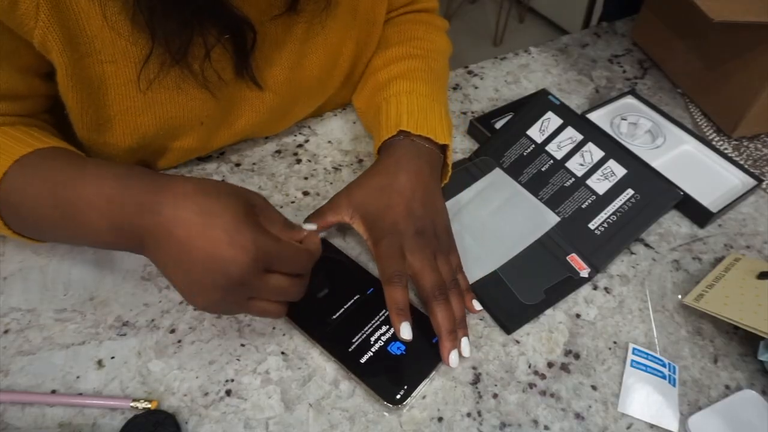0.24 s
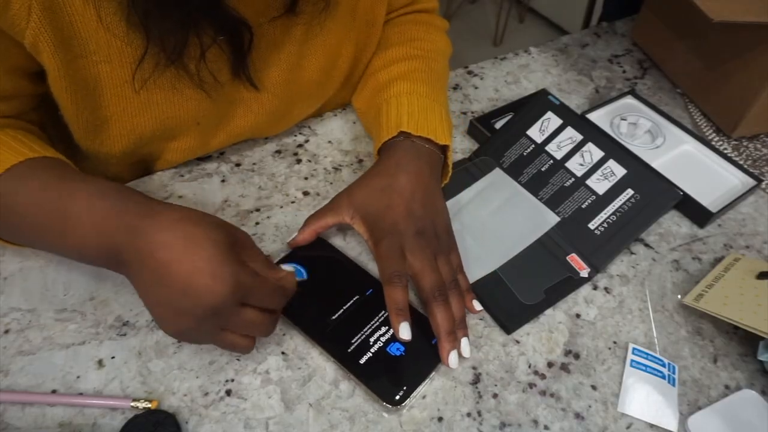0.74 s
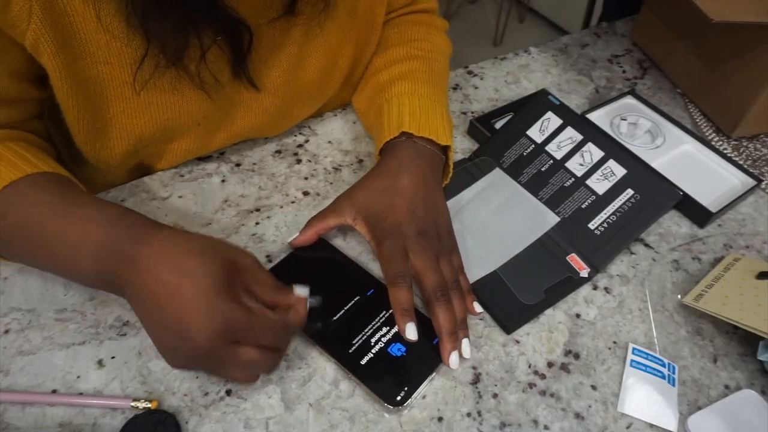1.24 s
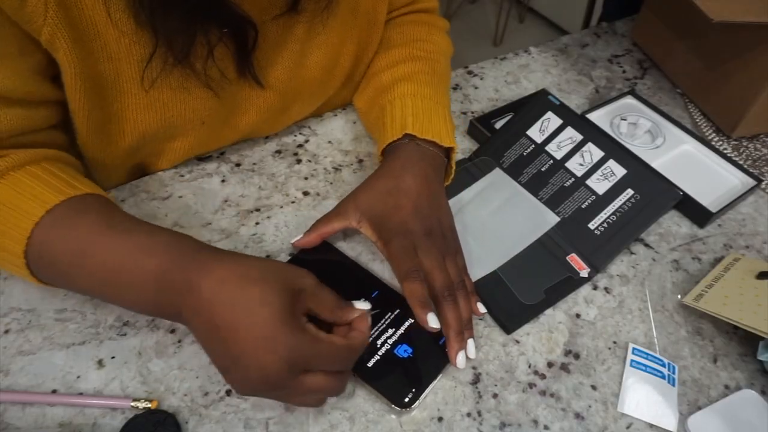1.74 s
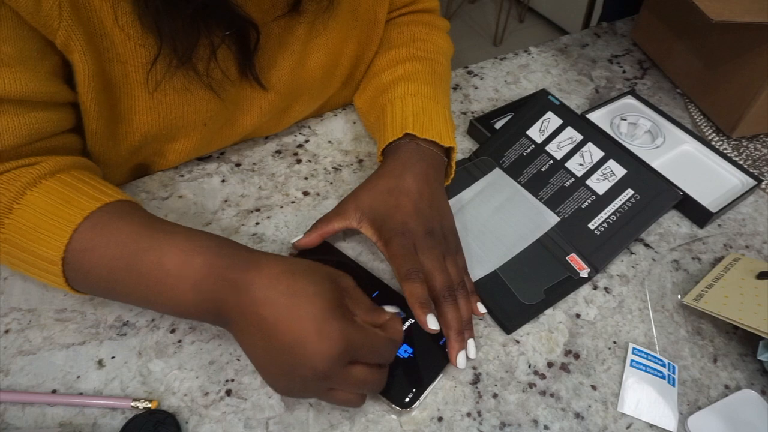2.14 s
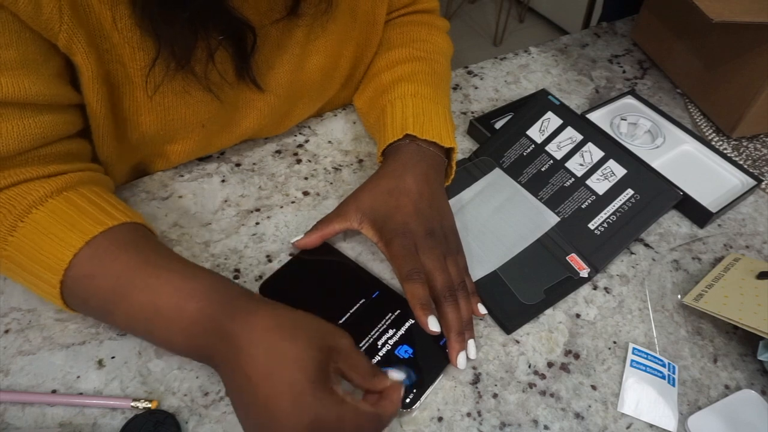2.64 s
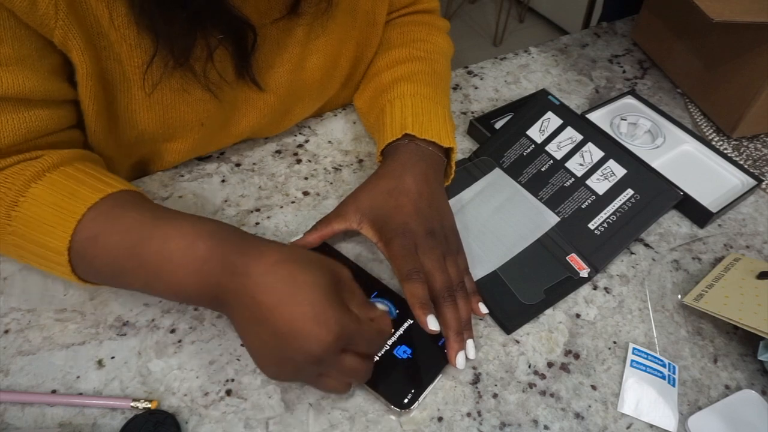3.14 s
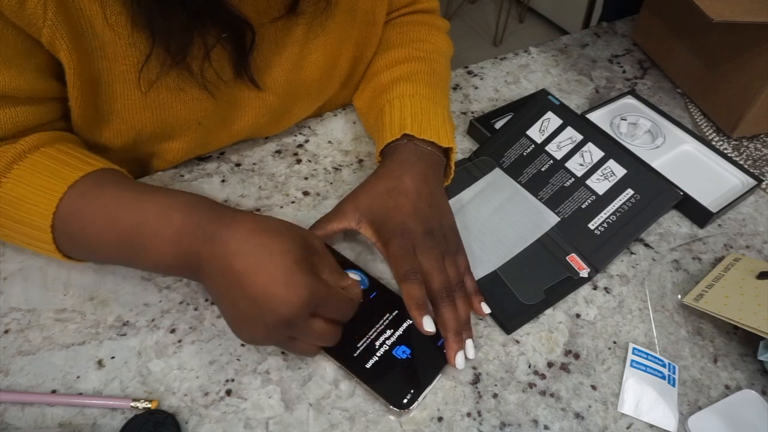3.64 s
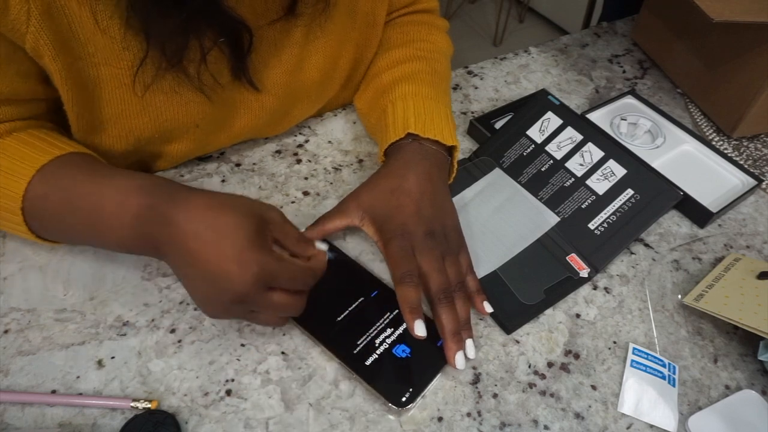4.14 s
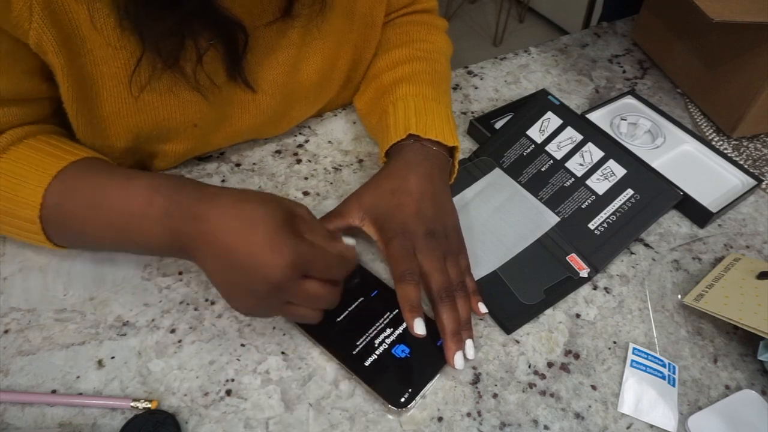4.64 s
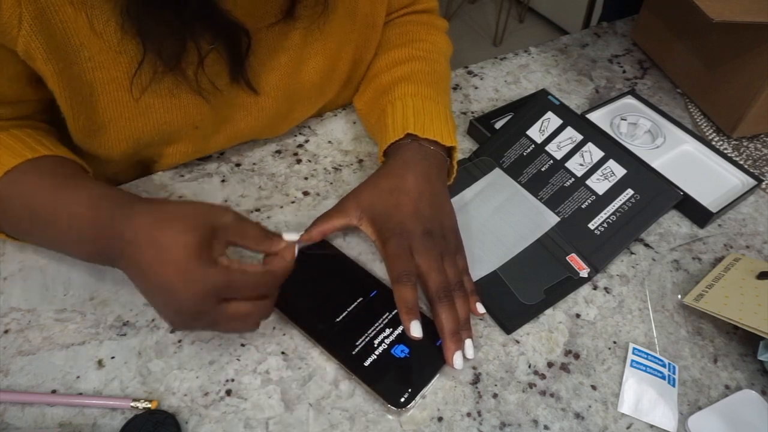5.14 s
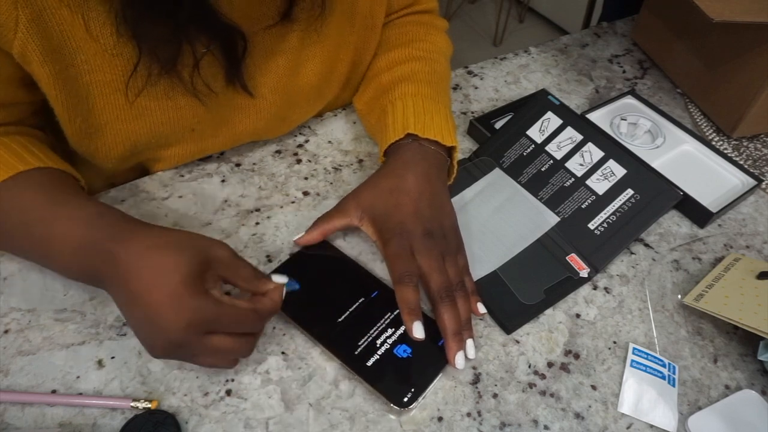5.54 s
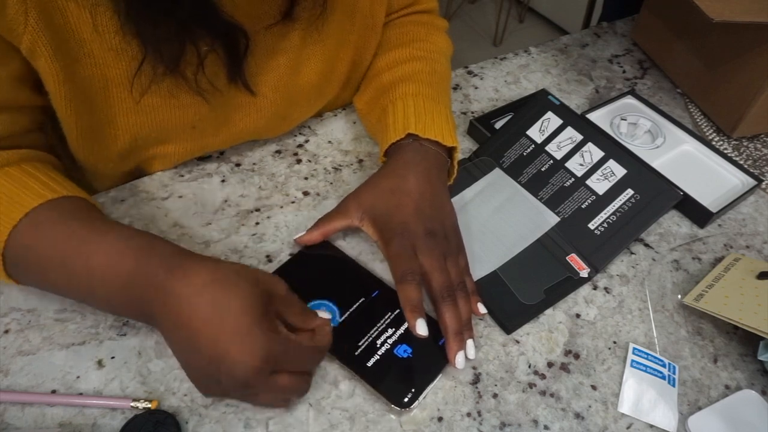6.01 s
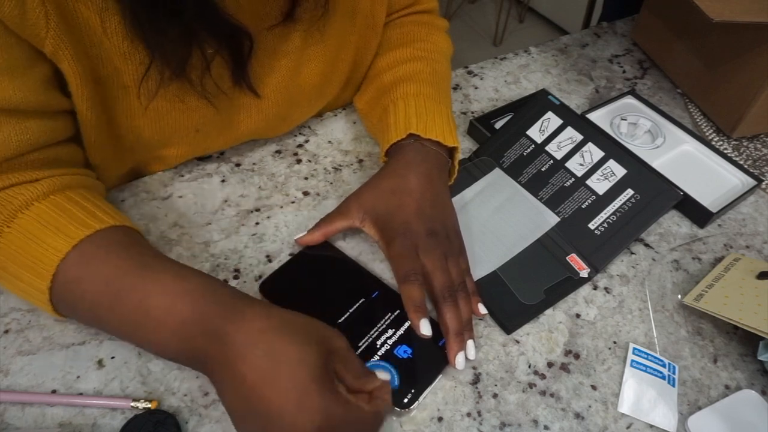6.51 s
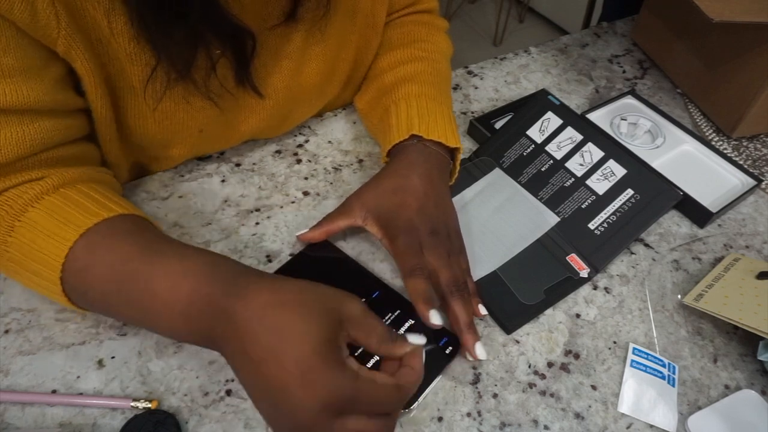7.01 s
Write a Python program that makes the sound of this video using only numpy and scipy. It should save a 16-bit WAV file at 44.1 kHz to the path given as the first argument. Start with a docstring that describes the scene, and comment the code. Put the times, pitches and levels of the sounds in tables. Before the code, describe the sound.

Long fingernails tap irregularly on a phone's glass screen, sharp dry clicks with small clusters and dull knocks on stone in a quiet kitchen.

```python
"""Fingernails on a glass phone

Long nails tap and skid over the glass of a phone that lies on a stone counter; one slides briefly.
Each tap is a single contact or a cluster of them: a snap and grainy skid drive resonances of nail, nail tip,
glass and case. Fingertips touch softly, and now and then the phone rocks and knocks on the stone.
Decaying bands of noise make a hard-walled kitchen ring on around them, over a quiet, steady hush."""
import sys
import numpy as np
from scipy import signal
from scipy.fft import rfft, irfft, next_fast_len
from scipy.io import wavfile

SR = 44100
rng = np.random.default_rng(int(sys.argv[2]) if len(sys.argv) > 2 else 0)


def dump(signal):
    """Clip the signal to [-1, 1] and save it as 16-bit WAV at the path in sys.argv[1]."""
    limited = np.clip(np.atleast_2d(signal).T, -1, 1)
    pcm = np.round(limited * 32767).astype(np.int16)
    wavfile.write(sys.argv[1], SR, pcm)


N = 320607  # samples in the scene
CONTACT_SIZE = 1536  # samples in one short contact sound


def from_db(db):
    """Decibels to gain."""
    return 10 ** (np.asarray(db) / 20)


def at_hz(points, hz):
    """Read a table on a log-frequency axis."""
    f, value = np.transpose(points)
    return np.interp(np.log(hz), np.log(f), value)


def band(x, low_hz, high_hz, order=2):
    """Causal band-pass."""
    sos = signal.butter(order, [low_hz, min(high_hz, SR / 2 - 1)], "band", fs=SR, output="sos")
    return signal.sosfilt(sos, x)


def resonate(x, modes):
    """Parallel two-pole resonances with alternating signs; a wider mode dies sooner."""
    out = 0
    for k, (hz, width_hz, db) in enumerate(modes):
        radius = np.exp(-np.pi * width_hz / SR)
        poles = [1, -2 * radius * np.cos(2 * np.pi * hz / SR), radius * radius]
        ringing = (1 - radius * radius) / 2 * signal.lfilter([1, 0, -1], poles, x)
        out = out + (-1) ** k * from_db(db) * ringing
    return out


def ring_each(force, pitches_hz, width_hz):
    """Every contact drives one resonance of its own pitch."""
    rings = [resonate(force[:, k], [(hz, width_hz, 0)]) for k, hz in enumerate(pitches_hz)]
    return np.stack(rings, axis=1)


def two_ears(pair, alike):
    """Mix two unrelated signals into left and right of a given likeness."""
    alike = np.clip(alike, -1, 1)
    mid = np.sqrt((1 + alike) / 2) * pair[0]
    side = np.sqrt((1 - alike) / 2) * pair[1]
    return np.array([mid + side, mid - side])


def contact(count, snap, chatter_s, skid_db, skid_s, alike):
    """Force of each contact: one sharp snap, a brief chatter, then a faint grainy skid."""
    t = np.arange(CONTACT_SIZE) / SR
    grains = rng.standard_normal((count, 2, CONTACT_SIZE)).swapaxes(0, 1)
    grains = grains * np.abs(grains)  # spikier than plain noise
    skid = np.reshape(from_db(skid_db), (-1, 1)) * np.exp(-t / skid_s)
    force = grains * (np.exp(-t / chatter_s) + skid)
    force[0, :, 0] += snap
    return two_ears(force, alike)


def at_level(sounds, level_db):
    """Give each short sound its level: its whole energy, taken as rms over 5 ms."""
    power = np.sum(sounds ** 2, axis=-1).mean(axis=0) / (.005 * SR)
    return sounds * (from_db(level_db) / np.sqrt(power))[:, None]


def blend(first, second, share, level_db):
    """Two sounds split a level between them; the first takes the given share of the power."""
    share = np.clip(share, .02, .98)  # neither falls silent
    first_db = level_db + 10 * np.log10(share)
    second_db = level_db + 10 * np.log10(1 - share)
    return at_level(first, first_db) + at_level(second, second_db)


def place(times, sounds):
    """Lay short stereo sounds out in time."""
    out = np.zeros((2, N + 2 * CONTACT_SIZE))
    for k, s in enumerate(times):
        start = int(np.clip(round(s * SR), 0, N))
        out[:, start:start + CONTACT_SIZE] += sounds[:, k]
    return out[:, :N]


# How alike the two channels are in diffuse sound.
# Each row: frequency in Hz, likeness from 0 to 1.
DIFFUSE_LIKENESS = [(60, .9), (500, 0.37), (1200, 0.3), (2500, 0.52), (4500, 0), (11000, 0.48)]


def diffuse_bands(size):
    """Half-octave bands of stereo noise as (centre Hz, noise), together flat."""
    edges = 22 * 2 ** (np.arange(20) / 2)
    for low, high in zip(edges, edges[1:]):
        hz = np.sqrt(low * high)
        noise = band(rng.standard_normal((2, size)), low, high, order=3)
        yield hz, two_ears(noise, at_hz(DIFFUSE_LIKENESS, hz))


# Colour of the room's quiet air.
# Each row: frequency in Hz, relative spectral level in dB per Hz.
AIR_COLOUR = [(25, -9), (55, -5.5), (120, 0), (250, -2), (370, -5.5), (600, -2), (850, -1.5), (1300, -4),
              (3000, -9), (5500, -9), (11000, -18)]
AIR_DB = -61  # rms of the whole hush


def room_air():
    """A steady, soft hush of noise, shaped band by band."""
    air = sum(noise * from_db(at_hz(AIR_COLOUR, hz)) for hz, noise in diffuse_bands(size=N))
    return from_db(AIR_DB) * air / air.std()


# How long the kitchen rings. Each row: frequency in Hz, time to fall by 60 dB in seconds.
KITCHEN_T60 = [(120, 0.53), (400, 1.1), (1000, 0.57), (2800, 0.55), (6000, .5), (11000, 0.53)]
# How loudly it answers. Each row: frequency in Hz, reverberant level in dB relative to the direct sound.
KITCHEN_LEVEL = [(120, -1.5), (300, -0.5), (700, -8), (1500, -8.5), (3000, -12), (5500, -6), (8000, -6.5),
                 (11000, -23)]


def kitchen(x, build_s=0.007):
    """Reflections thicken within milliseconds, then each band dies at its own rate."""
    t = np.arange(SR) / SR
    build = 1 - np.exp(-(t / build_s) ** 2)
    ending = np.cos(np.pi / 2 * t ** 4) ** 2  # closes the one-second response smoothly
    response = 0
    for hz, noise in diffuse_bands(size=SR):
        decay = np.exp(-np.log(1000) * t / at_hz(KITCHEN_T60, hz))
        fade = decay * build * ending
        unit_fade = fade / np.sqrt(np.sum(fade ** 2))
        response = response + noise * unit_fade * from_db(at_hz(KITCHEN_LEVEL, hz))
    return signal.fftconvolve(x, response, axes=1)[:, :N]


# Things in the kitchen that ring on in sympathy.
# Each row: frequency in Hz, width in Hz, gain in dB.
SYMPATHETIC_MODES = [(108, 5.3, 0.5), (218.5, 10, 8.5), (741.5, 2.4, 3)]


def reflections(nails, knocks, knock_db=1.0):
    """What leaves to the left and to the right meets different walls; kitchen things hum along."""
    left, right = (nails + from_db(knock_db) * knocks)[:, None]
    walls = (kitchen(left) + kitchen(right)) / np.sqrt(2)
    return walls + resonate((left + right) / 2, SYMPATHETIC_MODES)


# The phone rocking on the counter.
# Each row: start in seconds, body level in dB, hard edge in dB relative to the body,
# seconds until it drops back (0 if it does not).
PHONE_ROCKS = [(0.723, -51.5, -13, 0.005), (1.0067, -45.5, 2, 0.0058), (1.094, -31.5, -0.5, 0.0092),
               (1.2805, -44.5, 2.5, 0), (1.305, -30.5, 1, 0), (1.3697, -32.5, -1, .0065),
               (1.5542, -36, -1, 0.00097), (1.5741, -33, 1, 0.00017), (2.8605, -34, -0.5, .012),
               (5.4879, -25.5, -0.5, .0188), (5.9935, -27, -3, 0), (6.268, -31, 0, .0085),
               (7.0867, -31.5, -1, .019), (7.142, -33, -1.5, 0.017), (7.1905, -36, -1, 0.013),
               (7.2311, -37.5, -2.5, 0.013), (7.2666, -41, -2, 0)]
DROP_BACK_DB, DROP_BACK_EDGE_DB = -3.5, 0.5  # dropping back is softer but harder-edged


def knock_contacts():
    """The phone tips onto the stone and mostly drops back a moment later."""
    tips = [(s, level_db, edge_db) for s, level_db, edge_db, _ in PHONE_ROCKS]
    drops = [(s + back_s, level_db + DROP_BACK_DB, edge_db + DROP_BACK_EDGE_DB)
             for s, level_db, edge_db, back_s in PHONE_ROCKS if back_s > 0]
    return tips + drops


# Resonances of the phone's body against the counter, of its frame, and of the heavy counter.
# Each row: frequency in Hz, width in Hz, gain in dB.
BODY_MODES = [(590, 120, -3.5), (777, 190, -3.5), (1027, 253, -2.5)]
EDGE_MODES = [(1690, 167, 1), (2110, 260, 2.5), (2720, 235, 4.5), (3940, 1000, -10), (7900, 30000, -17.5)]
STONE_MODES = [(112, 16, -3.5), (204.6, 36, 0.2), (280, 57, 0.8)]
THUD_DB = -17  # counter's thud relative to the body


def phone_knocks():
    """The phone drops a hair onto the stone: dull body, harder frame edge, thud from the counter."""
    s, level_db, edge_db = np.transpose(knock_contacts())
    force = contact(len(s), snap=18.3, chatter_s=0.0022, skid_db=-8.0, skid_s=0.012, alike=0.99)
    body = band(resonate(force, BODY_MODES), 340, 1630)
    frame = band(resonate(force, EDGE_MODES), 1000, 7700)
    # the heavy counter feels mostly the net push of the blow
    push = contact(len(s), snap=80, chatter_s=.001, skid_db=-30, skid_s=.005, alike=1)
    thud = band(resonate(push, STONE_MODES), 43, 350)
    knocks = at_level(body, level_db) + at_level(frame, level_db + edge_db)
    return place(s, knocks + at_level(thud, level_db + THUD_DB))


# Loudness of a nail sliding over the glass.
# Each row: time in seconds, level in dB.
SLIDE_LEVEL = [(0.40, -80), (0.42, -59), (0.45, -67), (0.466, -49.5), (0.477, -54), (0.485, -81),
               (0.51, -85)]


def nail_slide():
    """Friction feeds the nail and its tip with fine grains."""
    grains = two_ears(rng.standard_normal((2, N)), 0.91)
    grains = grains * np.abs(grains)
    # each mode: Hz, width Hz, dB
    hiss = resonate(grains, [(607, 140, -2.5), (3100, 850, -5.0), (9270, 1700, -9.5)])
    s, level_db = np.transpose(SLIDE_LEVEL)
    loudness = np.interp(np.arange(N) / SR, s, from_db(level_db), left=0, right=0)
    return hiss / hiss.std() * loudness


# Soft touches of a fingertip. Each row: start in seconds, level in dB.
FINGER_TOUCHES = [(0.3997, -55.5), (0.4758, -57), (0.97, -56), (2.827, -46.5), (3.076, -56.5), (3.593, -50),
                  (4.1204, -44), (4.139, -52), (4.4163, -52), (4.655, -49.5), (5.45, -50.5), (5.724, -49),
                  (5.778, -43), (5.959, -53), (6.206, -52), (6.476, -47), (6.746, -47), (7.029, -54),
                  (7.047, -51)]
# Their common dull colour, one row: ring in Hz, clean share of the power from 0 to 1, case spot in Hz,
# then case, glass and tick in dB relative to the touch's level, skid in dB relative to the hit.
DULL_COLOUR = (2600, 0.55, 657, -2, -12, -15.5, -10.5)


def touch_contacts():
    """A soft touch is a single dull contact."""
    return [(s, level_db, *DULL_COLOUR) for s, level_db in FINGER_TOUCHES]


BOUNCE_S = .0108  # longest nominal gap between contacts within a tap


def bounces(lead_s, run_s):
    """Moments of one tap's contacts, counted from its main hit."""
    before = np.linspace(-lead_s, 0, int(np.ceil(max(lead_s, 0) / BOUNCE_S)) + 1)
    after = np.linspace(0, run_s, int(np.ceil(max(run_s, 0) / BOUNCE_S)) + 1)
    return np.concatenate([before[:-1], after])


# Nail taps on the glass.
# Each row: main hit in seconds, lead-in in seconds, run-out in seconds, nail level in dB, ring in Hz,
# clean ring's share of the nail's power from 0 to 1, Hz that the struck spot of the case favours,
# then case, glass and tick in dB relative to the nail.
NAIL_TAPS = [(0.1682, 0.0038, .008, -31.5, 2850, 0.6, 1430, -12, -7, -8.5),
             (0.172, 0.0013, 0, -33.5, 3960, .7, 1430, -18, -23, -5.5),
             (0.49, 0, 0.0014, -58, 3780, .5, 1430, -17, -15, 4),
             (0.7588, 0, .0054, -24.5, 2860, 0.75, 1085, -13, -10, -7.5),
             (1.0526, .007, .012, -24.5, 3407, 0.37, 1640, -13.5, -6, -3),
             (1.3388, .009, .016, -26.5, 2140, 0.1, 1650, -8.5, -7.5, 0),
             (1.6069, 0, 0, -29, 2080, .5, 1700, -13, -7, -1),
             (1.6277, .0103, .0043, -27, 2040, 0.24, 1700, -6, -4, 1),
             (1.789, 0, 0, -37, 2620, 0.57, 1582, -2, -4, -8),
             (1.8815, .007, 0, -25.5, 4500, .6, 1590, -3.5, 1.5, -5),
             (1.8978, 0, 0, -28, 2820, .1, 1600, -2, -4, 3), (2.103, 0, 0, -50, 4580, 0.5, 1500, 3, 9, 13),
             (2.121, 0.000047, .018, -28.5, 2900, 0.17, 1400, -1.5, -1, -1.5),
             (2.2969, .009, 0, -39.5, 2330, 0.5, 1280, -2, -0.5, 7),
             (2.363, .006, .0105, -30.5, 2450, 0.4, 1060, -2, -5, 1.5),
             (2.56, .0105, 0.0003, -35, 2339, 0.95, 1270, -9.5, -9.5, -4.5),
             (2.6383, 0.0051, .018, -25.5, 2353, 0.62, 1602, -8, -6, -1),
             (2.8483, 0.00019, 0, -42.5, 2590, 0.3, 1600, 3, 3.5, 4),
             (2.9325, .013, 0, -35.5, 3000, 0.53, 956, -0.5, -3, 2),
             (3.1847, .02, .009, -29, 2780, 0.17, 1530, -1.5, -2, -4),
             (3.4095, 0, 0, -33, 2570, 0.43, 1510, -2.5, -3, -3),
             (3.419, 0, .01, -31, 3505, 0.13, 1490, -0.5, -3.5, -5.5),
             (3.4836, 0, 0, -41, 4770, 0.4, 1450, -3, -1.5, -7),
             (3.6133, 0.0002, 0, -31.5, 4900, 0.8, 1360, -7.5, -8, -13),
             (3.628, 0, 0, -31.5, 4370, 0.3, 1530, -14, -3, -6.5),
             (3.6888, .009, .007, -27, 3100, 0.29, 1413, -5, -3.5, -4.5),
             (3.7943, 0.00031, 0.000063, -32.5, 2230, 0.23, 1250, -7, -8, -3.5),
             (3.9, 0, 0, -39.5, 3100, .6, 1440, -11.5, -0.5, 5.5),
             (3.9696, 0.000071, 0.00026, -42, 3000, 0.56, 860, -13, -6, 4),
             (4.1719, 0, 0, -34.5, 2990, 0.27, 1510, -11, -12, -2.5),
             (4.2431, 0.00012, 0, -42, 2936, 0.8, 1440, -13.5, -4.5, -6),
             (4.4561, 0, 0.00016, -30, 4180, 0.6, 1130, -27, -11, -12),
             (4.4773, 0.000093, .0045, -22, 2930, 0.7, 1410, -20, -14, -13.5),
             (4.4902, 0, 0, -21.5, 2790, 0.05, 1440, -16, -10, -14),
             (4.5083, .009, .008, -29.5, 2840, 0.6, 890, -5.5, -4.5, -6),
             (4.6822, 0.00044, 0.000057, -42.5, 4240, 0.17, 1340, -11, 2, 8.5),
             (4.6995, 0.00024, 0.00061, -41, 2080, 0.2, 1450, -2, -1.5, -3.5),
             (4.7533, .03, .008, -29.5, 3100, 0.22, 1460, -5, -9, -8.5),
             (4.9385, 0.00025, 0, -30.5, 3068, .94, 1380, -10.5, -10.5, -3),
             (5.0059, 0.00022, .021, -26, 1980, 0.26, 915, -7, -8, -6.5),
             (5.2672, 0.00029, .0062, -27, 2990, 0.4, 1441, -10, -8, -11.5),
             (5.4649, 0, 0.00012, -36, 3200, 0.5, 1480, -7, -7.5, -3),
             (5.5194, 0, 0, -33, 3386, .8, 769, -13, -9, -2),
             (5.5342, 0.00083, .011, -22.5, 2750, 0.93, 1550, -5.5, -15.5, -11),
             (5.749, 0, 0.00021, -38, 2801, 0.55, 1710, -7.5, -10, -0.5),
             (6.0004, 0, .014, -25.5, 2575, 0.53, 751.5, -4.5, -9, -6.5),
             (6.024, 0, 0, -42, 2720, .2, 750, -3, -6, 9),
             (6.0389, 0.0013, 0.00072, -38.5, 2230, .2, 763, -4, -5, 1),
             (6.0578, .004, .004, -29.5, 2830, 0.4, 1740, -4, -3, -0.5),
             (6.2296, 0, 0.00039, -35, 2170, 0.2, 1530, -6.5, -9, -2),
             (6.3061, 0.00059, .015, -28, 3170, .15, 1750, -7.5, -4, -1.5),
             (6.5, 0.0011, 0, -37, 2270, 0.35, 1660, -6, -11, -1.5),
             (6.5757, 0.00093, .02, -27, 2529, 0.49, 1540, -12.5, -7, -7),
             (6.7808, 0.0012, 0, -35.5, 2460, .38, 1680, -7.5, -8, -4),
             (6.8521, .017, .006, -26, 2447, 0.45, 1580, -8, -10.5, -6),
             (7.0656, 0.0019, 0.0021, -41.5, 2620, 0.6, 1398, -10.5, -12, -20)]
# how far the lesser contacts stray
BOUNCE_JITTER_S, BOUNCE_SCATTER_DB, BOUNCE_SCATTER_OCTAVES = .0003, 0.4, 0.051
# contacts grow towards the main hit and die away after it
RISE_DB_PER_S, FALL_DB_PER_S = 441, 336
# the tip lands first and the finger's weight follows: less tick and more case as a tap goes on
TICK_FADE_DB_PER_S, CASE_GROWTH_DB_PER_S = 105, 124
# skid relative to the hit: from one contact into the next, and as the nail lifts off
SKID_DB, LIFT_OFF_DB = -5.5, -18
# the nail's edge brushes the glass before a bouncing tap: lead, level and tick against the first contact
BRUSH_S, BRUSH_DB, BRUSH_TICK_DB = .0035, -20, 2


def tap_contacts(size=16):
    """Taps hit once or graze, hit and bounce out; lesser contacts stray in time, strength and pitch."""
    spread = [BOUNCE_JITTER_S, BOUNCE_SCATTER_DB, BOUNCE_SCATTER_OCTAVES]
    rows = []
    for tap, chance in zip(NAIL_TAPS, rng.standard_normal((len(NAIL_TAPS), size, 3))):
        s, lead_s, run_s, level_db, ring_hz, clean, spot_hz, case_db, glass_db, tick_db = tap
        moments = bounces(lead_s, run_s)
        if len(moments) > 1:
            brush_db = level_db - RISE_DB_PER_S * lead_s + BRUSH_DB
            rows.append((s - lead_s - BRUSH_S, brush_db, ring_hz, clean,
                         spot_hz, case_db, glass_db, tick_db + BRUSH_TICK_DB, SKID_DB))
        for t, draw in zip(moments, chance):
            late_s, stray_db, octaves = draw * (t != 0) * spread  # the main hit stays put
            swell_db = min(RISE_DB_PER_S * t, -FALL_DB_PER_S * t)
            skid_db = LIFT_OFF_DB if t == moments[-1] else SKID_DB
            rows.append((s + t + late_s, level_db + swell_db + stray_db, ring_hz * 2 ** octaves, clean,
                         spot_hz, case_db + CASE_GROWTH_DB_PER_S * t, glass_db,
                         tick_db - TICK_FADE_DB_PER_S * t, skid_db))
    return rows


# Resonances of the phone's case under a nail.
# Each row: frequency in Hz, width in Hz, gain in dB.
PHONE_CASE_MODES = [(633, 324, -2.5), (913, 343, -0.5), (1573, 363, 0.5)]


def case_answer(skid_db):
    """The case answers the blow with its broad low modes."""
    force = contact(len(skid_db), snap=6.5, chatter_s=0.0017, skid_db=skid_db, skid_s=0.013, alike=0.95)
    return band(resonate(force, PHONE_CASE_MODES), 366, 3160)


def struck_spot(spot_hz, skid_db):
    """The place that is struck favours one resonance of the case."""
    force = contact(len(skid_db), snap=14.2, chatter_s=0.0028, skid_db=skid_db, skid_s=0.0083, alike=1.0)
    return band(ring_each(force, spot_hz, width_hz=226), 437, 1820)


# Resonances of the glass.
# Each row: frequency in Hz, width in Hz, gain in dB.
GLASS_RESONANCES = [(4220, 1050, 3), (5840, 2270, 3), (6895, 1840, 2.5)]


def glass_answer(skid_db):
    """The glass answers brightly through wide, quickly dying modes."""
    force = contact(len(skid_db), snap=17.5, chatter_s=0.0015, skid_db=skid_db, skid_s=0.012, alike=0.14)
    return band(resonate(force, GLASS_RESONANCES), 3600, 14000)


# Resonances of the nail's tip.
# Each row: frequency in Hz, width in Hz, gain in dB.
NAIL_TIP_MODES = [(8740, 1110, -5), (8944, 665, -2), (10665, 460, 4)]


def tip_tick(skid_db):
    """The small nail tip ticks at the top of the spectrum."""
    force = contact(len(skid_db), snap=14.0, chatter_s=0.00075, skid_db=skid_db, skid_s=0.0075, alike=0.38)
    return band(resonate(force, NAIL_TIP_MODES), 7410, 9690)


def nail_rattle(skid_db):
    """A glancing hit rattles across all the modes of the nail."""
    force = contact(len(skid_db), snap=14.0, chatter_s=0.002, skid_db=skid_db, skid_s=0.0095, alike=0.63)
    # each mode: Hz, width Hz, dB
    modes = [(2080, 310, -1.7), (2940, 830, -0.37), (3980, 690, -0.085)]
    return band(resonate(force, modes), 1530, 4230)


def nail_ring(ring_hz, skid_db):
    """A square hit sets one mode of the nail swinging."""
    force = contact(len(skid_db), snap=25.0, chatter_s=0.00072, skid_db=skid_db - 1, skid_s=0.0075, alike=1.0)
    return band(ring_each(force, ring_hz, width_hz=210), 1810, 4550)


SPOT_SHARE = 0.39  # struck spot's share of the case's power
# the clean ring carries mainly to the front: the part of its share left in what the walls receive
RING_TO_WALLS = 0.71


def nail_clicks():
    """Nail rings cleanly or rattles at each contact; case, glass and tip sound with it."""
    contacts = np.transpose(tap_contacts() + touch_contacts())
    s, level_db, ring_hz, clean, spot_hz, case_db, glass_db, tick_db, skid_db = contacts
    ring = nail_ring(ring_hz, skid_db)
    rattle = nail_rattle(skid_db)
    case = blend(struck_spot(spot_hz, skid_db), case_answer(skid_db), SPOT_SHARE, level_db + case_db)
    glass = at_level(glass_answer(skid_db), level_db + glass_db)
    tip = at_level(tip_tick(skid_db), level_db + tick_db)
    rest = case + glass + tip
    to_front = place(s, blend(ring, rattle, clean, level_db) + rest)
    to_walls = place(s, blend(ring, rattle, clean * RING_TO_WALLS, level_db) + rest)
    return to_front, to_walls


# The two microphone ports.
# Each row: frequency in Hz, left minus right in dB, lead of the left in radians.
MICROPHONE_PORTS = [(300, 0.5, 0.012), (1020, -1.62, 0.063), (3000, -2, 0.84), (5550, -2.5, 1.85),
                    (9550, -1.0, 0.99)]


def at_microphones(x):
    """Above the lows the right port hears more; the left hears everything a moment sooner."""
    size = next_fast_len(N)
    hz = np.maximum(np.fft.rfftfreq(size, 1 / SR), 1)
    ports = np.array(MICROPHONE_PORTS)
    pan_db = at_hz(ports[:, [0, 1]], hz)
    lead = at_hz(ports[:, [0, 2]], hz)
    response = np.array([from_db(pan_db / 2), from_db(-pan_db / 2) * np.exp(-1j * lead)])
    return irfft(rfft(x, size) * response, size)[:, :N]


def scene():
    """Nails and phone close by, the kitchen around them."""
    to_front, to_walls = nail_clicks()
    slide = nail_slide()
    knocks = phone_knocks()
    direct = to_front + slide + knocks
    return at_microphones(direct + reflections(to_walls + slide, knocks)) + room_air()


CUTOFF_HZ = 11250


def record(dry):
    """A steep elliptic low-pass cuts the top."""
    low_pass = signal.ellip(10, .3, 70, CUTOFF_HZ, fs=SR, output="sos")  # order, ripple dB, stop-band dB
    return signal.sosfilt(low_pass, dry)


dry = scene()
out = record(dry)
dump(out)
```